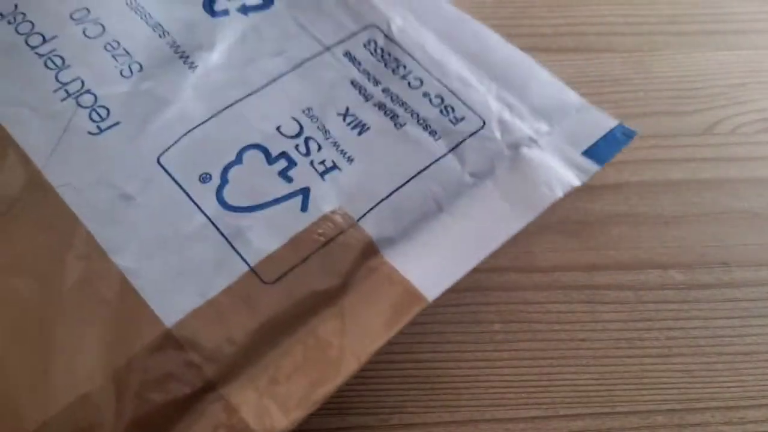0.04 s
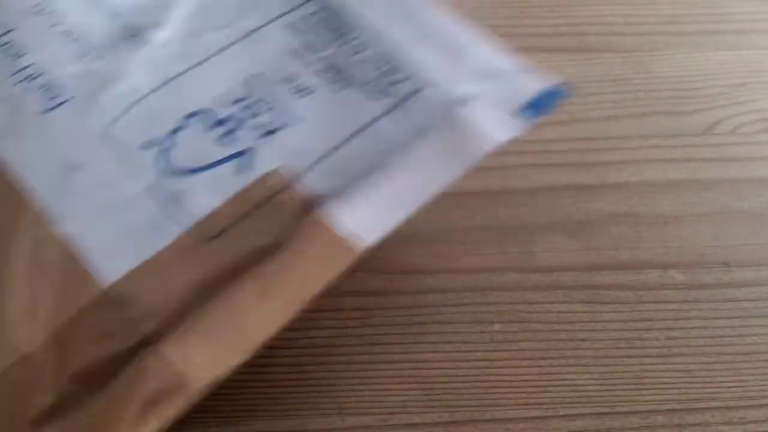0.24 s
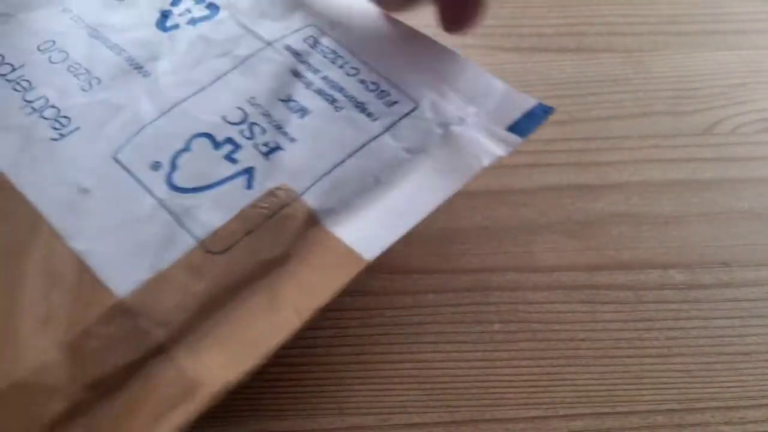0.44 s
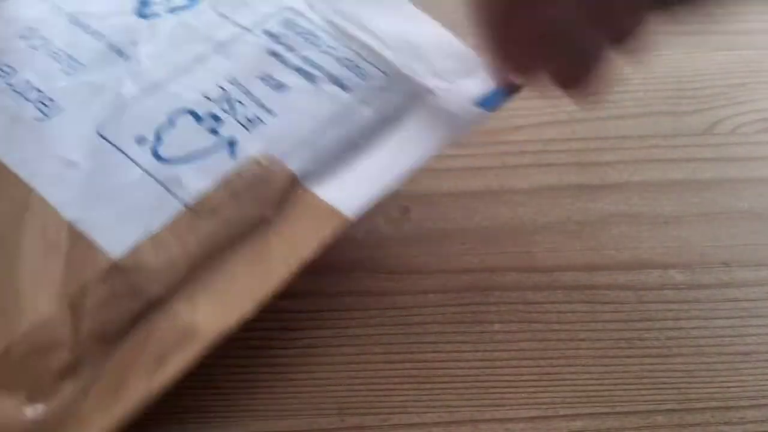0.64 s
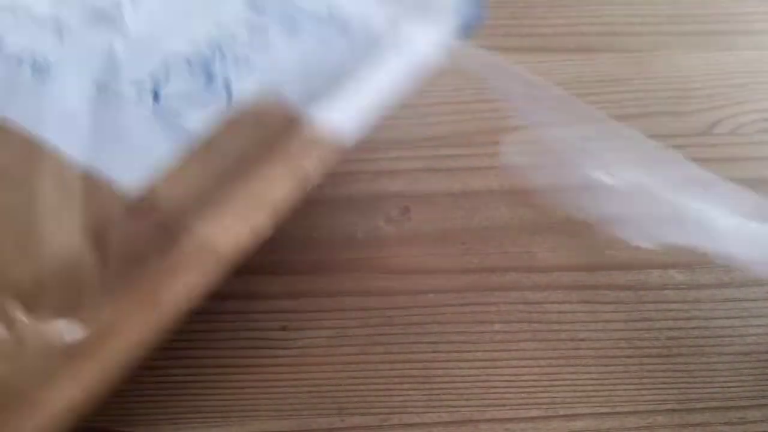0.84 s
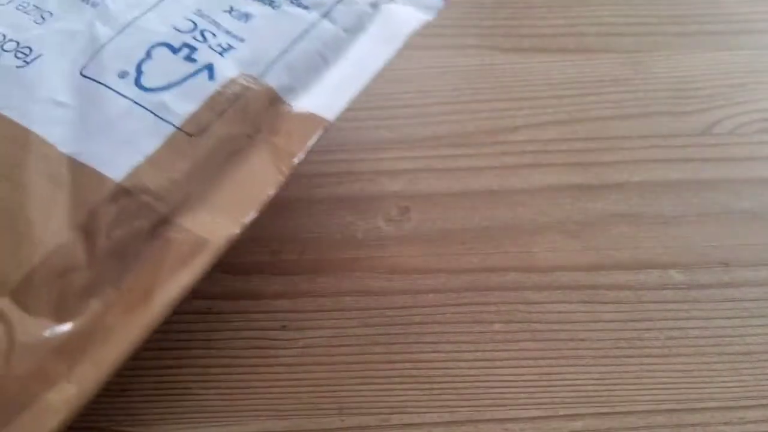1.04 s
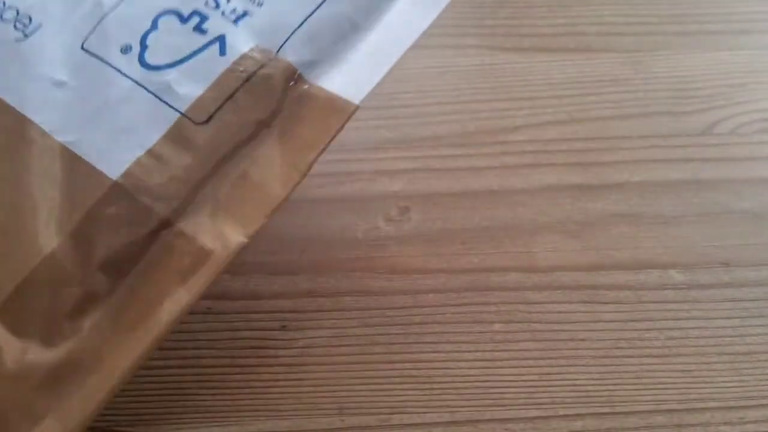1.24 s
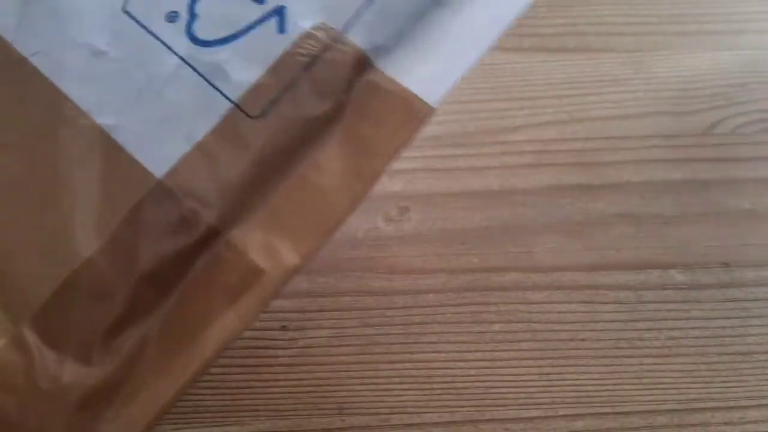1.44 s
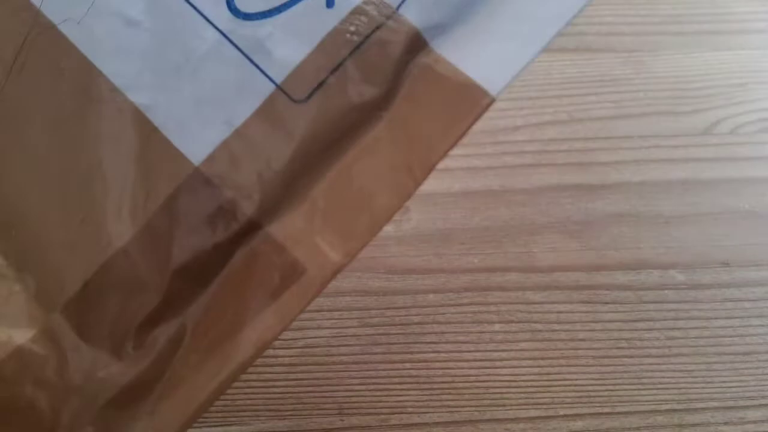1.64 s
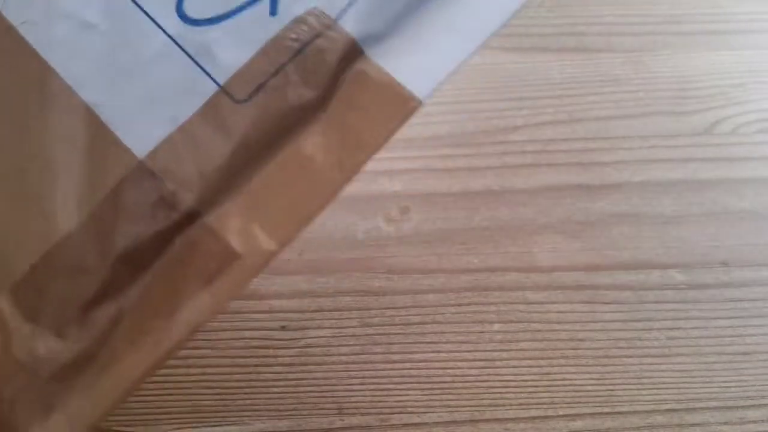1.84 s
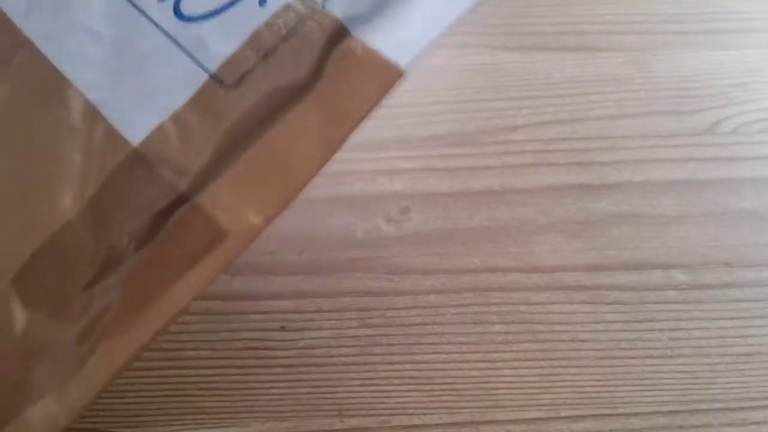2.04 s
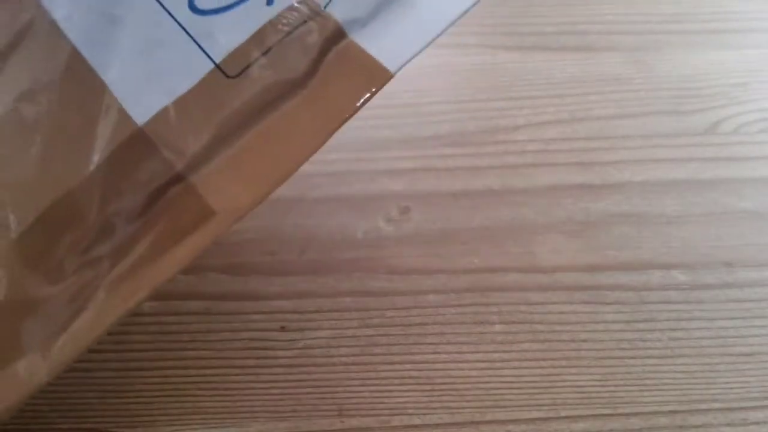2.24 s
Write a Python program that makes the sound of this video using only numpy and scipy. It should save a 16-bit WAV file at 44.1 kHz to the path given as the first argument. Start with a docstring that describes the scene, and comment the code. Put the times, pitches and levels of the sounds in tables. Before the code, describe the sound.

A padded paper mailer is torn open in quick ripping pulls, then crinkles softly on wood

```python
"""A padded paper mailer is torn open in a few quick pulls on a wooden table, heard from close by.
Tearing is dense swarms of tiny noise snaps and short pitched rings, with a low flutter of the bag.
Softer swarms slide the paper about, short noise cracks pop its creases, and soft knocks excite
decaying modes of the table top; one note judders briefly. A small room adds a short wash,
over low handling rumble and a quiet room tone."""
import sys
import numpy as np
from scipy import signal
from scipy.fft import rfft, irfft
from scipy.io import wavfile
from scipy.ndimage import uniform_filter1d

SR = 44100
rng = np.random.default_rng(int(sys.argv[2]) if len(sys.argv) > 2 else 0)


def master_out(mix):
    """Clip the mix to full scale and print it as 16-bit PCM to the path in sys.argv[1]."""
    frames = np.transpose(np.atleast_2d(mix))
    ceiling = np.clip(frames, -1, 1)
    pcm = np.round(ceiling * 32767).astype(np.int16)
    wavfile.write(sys.argv[1], SR, pcm)


N = 101430  # length in samples, 2.3 s


def undb(db):
    """Decibel law: level in dB to amplitude factor."""
    return 10 ** (np.asarray(db) / 20)


def unit(x):
    """Power normalisation: scale to rms 1."""
    return x / np.sqrt(np.mean(x ** 2) + 1e-18)


def panned(db):
    """Interaural level difference: gains of left and right, left louder by db."""
    return undb(np.array([[db], [-db]]) / 2)


def freqs(x):
    """Fourier analysis: bin frequencies in Hz, at least 1."""
    return np.maximum(np.fft.rfftfreq(x.shape[-1], 1 / SR), 1)


def curve(points, hz):
    """Spectral envelope: dB at the given frequencies, straight between points on a log axis."""
    p = np.array(points)
    return np.interp(np.log(hz), np.log(p[:, 0]), p[:, 1])


def bump(hz, centre, octaves):
    """Broad resonance: a bell on the octave scale, 1 at its centre."""
    return np.exp(-.5 * (np.log2(hz / centre) / octaves) ** 2)


def colour(x, db):
    """Linear filtering: a gain in dB for each frequency."""
    return irfft(rfft(x) * undb(db), x.shape[-1])


def bandpass(x, hz, octaves, order=1):
    """Causal band limiting, reaching so many octaves to each side."""
    low = min(hz / 2 ** octaves, SR / 4)
    high = min(hz * 2 ** octaves, .47 * SR)
    return signal.sosfilt(signal.butter(order, [low, high], "band", fs=SR, output="sos"), x)


PORTS_ALIKE_HZ = 890  # where likeness is midway between bass and treble
BASS_LIKENESS, TREBLE_LIKENESS = .76, 0.15  # shared part of the power


def ports(three):
    """Interaural coherence: a shared and two separate signals, alike in the bass, not the treble."""
    spectra = rfft(three)
    bass_share = 1 / (1 + (freqs(three) / PORTS_ALIKE_HZ) ** 4)
    alike = TREBLE_LIKENESS + (BASS_LIKENESS - TREBLE_LIKENESS) * bass_share
    stereo = np.sqrt(alike) * spectra[0] + np.sqrt(1 - alike) * spectra[1:]
    return irfft(stereo, three.shape[-1])


def noise(points):
    """Filtered random noise: stereo, of a given colour, rms 1."""
    x = ports(rng.standard_normal((3, N)))
    return unit(colour(x, curve(points, freqs(x))))


def envelope(at, rise, hold, fall):
    """Exponential growth and decay around a hold; rise and fall are the times for 20 dB."""
    t = np.arange(N) / SR - at
    return undb(-20 * (np.maximum(-t, 0) / rise + np.maximum(t - hold, 0) / fall))


def add(out, at, x):
    """Superposition: mix a short sound in at its time."""
    i = int(at * SR)
    out[:, i:i + x.shape[1]] += x[:, :N - i]


# Pulls that tear the paper: full_force_s, rise_s, hold_s, fall_s (rise and fall per 20 dB),
# level_db (before body and sheet boosts), body_db, flutter_db (relative to level_db),
# sheet_hz (resonance), pan_db (left over right)
PULLS = [(.256, 0.044, 0.058, 0.11, -27, 1, -20.5, 4800, -1),
         (.325, 0.085, 0.037, 0.058, -30.5, -3, -14, 6800, 0.5),
         (.412, 0.013, 0.0092, 0.033, -37, 1.5, -18, 7500, 1),
         (.485, 0.032, 0.0086, 0.028, -25.5, 0.5, -26.5, 4530, 0.5),
         (.512, 0.037, 0.014, 0.074, -36, 2, -20, 10000, 1.5),
         (.599, 0.04, 0.033, 0.093, -35.5, 0, -20.5, 8500, 1),
         (.652, 0.008, 0.0015, 0.022, -21.5, 4.5, -20.5, 5900, 3.5),
         (.673, 0.016, 0.011, 0.069, -19.5, 1.5, -22, 9400, -0.5),
         (.706, 0.01, 0.03, 0.039, -29, -0.5, -12, 8800, -1),
         (.81, 0.033, 0.0085, 0.081, -36.5, -8, -23, 6500, -3.5),
         (.848, 0.05, 0.023, 0.059, -31, 5, -10.5, 6800, -1)]
# Colour of tearing: pitch_hz, level_db (per Hz)
TEAR_COLOUR = [(180, -51.5), (300, -17.5), (634, -3.5), (978, -0.5), (1650, -4), (2610, -6), (3290, -2.5),
               (7700, -3.5), (9090, -3.5), (11200, -2.5), (12500, -4), (16000, -6.5)]
BUNDLE_DB = -4.5  # relative to the fine snaps


def tearing():
    """Brittle fracture: coarse, loud snapping of fibres along the tear."""
    def swarm(n):
        fine = fibres(n, per_s=4600, spread_db=4.4, ring_s=.001, clump_db=2.2, clump_hz=380)
        return fine + undb(BUNDLE_DB) * bundles(n)
    return strokes(PULLS, swarm, TEAR_COLOUR, sheet_db=4.0, sheet_octaves=0.16)


# Colour of the fluttering bag: pitch_hz, level_db (per Hz)
FLUTTER_COLOUR = [(25, -30), (60, 1.5), (110, -1), (200, -2), (330, -9.5), (550, -10), (1100, -60),
                  (4000, -57)]
STROKE_S = .6  # length of each swarm
BODY_HZ, BODY_OCTAVES = 1000, 1.0
BASS_PAN_DB = 3.5  # left over right


def strokes(rows, swarm, points, sheet_db, sheet_octaves):
    """Forced vibration: each movement works fresh paper with its own swarm and shakes the bag."""
    out = np.zeros((2, N))
    flutter = noise(FLUTTER_COLOUR) * panned(BASS_PAN_DB)
    for at, rise, hold, fall, db, body_db, flutter_db, sheet_hz, pan_db in rows:
        grains = swarm(int(STROKE_S * SR))
        hz = freqs(grains)
        grains = unit(colour(grains, curve(points, hz)))
        body = body_db * bump(hz, BODY_HZ, BODY_OCTAVES)
        resonance = sheet_db * bump(hz, sheet_hz, sheet_octaves)
        grains = colour(grains, body + resonance)
        sheet = np.zeros((2, N))
        add(sheet, max(at - STROKE_S / 3, 0), grains)  # leaves room for the rise
        moving = sheet * panned(pan_db) + undb(flutter_db) * flutter
        out += undb(db) * envelope(at, rise, hold, fall) * moving
    return out


def fibres(length, per_s, spread_db, ring_s, clump_db, clump_hz, count=4):
    """Clustered random impulses: uneven snaps in clumps; each patch of sheet rings in its own way."""
    t = np.arange(SR // 100) / SR
    drift = unit(uniform_filter1d(rng.standard_normal(length), int(SR / clump_hz)))
    clumps = undb(clump_db * np.tanh(drift))
    out = 0
    for _ in range(count):
        chance, size = rng.random(length), rng.standard_normal(length)
        strength = np.sign(size) * undb(spread_db * np.minimum(np.abs(size), 2))
        snaps = (chance < per_s / count / SR) * strength
        ring = rng.standard_normal((3, len(t))) * np.exp(-t / ring_s)
        out = out + signal.fftconvolve((snaps * clumps)[None], ring, axes=1)[:, :length]
    return unit(ports(out))


BUNDLES_PER_S, BUNDLE_HZ = 850, (800, 12000)
BUNDLE_CYCLES = 3.5  # ring decays by a factor e in this many cycles


def bundles(length):
    """Damped oscillation: bundles of fibres give way one by one, each ringing at its own pitch."""
    out, t = np.zeros((3, length)), np.arange(SR // 100) / SR
    for when, pitch, size, *sides in rng.random((int(BUNDLES_PER_S * length / SR), 6)):
        hz = np.exp(np.interp(np.sqrt(pitch), (0, 1), np.log(BUNDLE_HZ)))  # favours high pitches
        i = int(when * (length - len(t)))
        # the root of hz evens out the energy of short and long rings
        ring = np.sqrt(hz) * np.sin(2 * np.pi * hz * t) * np.exp(-hz * t / BUNDLE_CYCLES)
        polarity = np.sign(np.array(sides)[:, None] - .5)
        out[:, i:i + len(t)] += undb(10 * size) * polarity * ring
    return unit(ports(out))


# Paper sliding on wood and skin: full_force_s, rise_s, hold_s, fall_s (rise and fall per 20 dB),
# level_db (before body and sheet boosts), body_db, flutter_db (relative to level_db),
# sheet_hz (resonance), pan_db (left over right)
SLIDING_STROKES = [(.005, 0.034, 0.047, 0.026, -45.5, 12.5, -23, 3760, 1.5),
                   (.95, 0.037, .01, 0.24, -61.5, -7, -4, 7000, 4),
                   (1.04, 0.16, 0.13, 0.074, -53, -5, -23, 9400, -1.5),
                   (1.16, 0.035, 0.007, 0.068, -43, -1.5, -14.5, 9000, 0.5),
                   (1.258, 0.077, 0.079, 0.097, -48, 6.5, -6, 8060, 1.5),
                   (1.365, 0.035, 0.012, 0.091, -57.5, 5, 5, 7050, -2),
                   (1.6, .09, 0.032, .04, -71, 3.5, -15, 7060, -3),
                   (1.657, 0.0024, 0.0051, 0.013, -42.5, 11, -18, 1090, 2),
                   (1.677, 0.022, 0.038, 0.055, -41.5, 4, -33, 7950, -2.5),
                   (1.8, 0.087, 0.014, 0.023, -49, 18, -2, 6000, 0),
                   (1.868, 0.067, 0.017, 0.0071, -44, 13.5, -8, 6500, 0.5),
                   (1.99, 0.17, 0.03, 0.084, -57.5, 16.5, -1.5, 5960, -0.5),
                   (2.055, 0.094, 0.041, 0.034, -57, 16, -1, 4830, 1.5),
                   (2.145, 0.019, 0.026, 0.066, -50, 12, -1, 6300, 0.5),
                   (2.29, 0.07, .02, .05, -48, 12.5, -7, 4600, 1)]
# Colour of sliding: pitch_hz, level_db (per Hz)
SLIDE_COLOUR = [(150, -8), (450, -4), (1000, 1), (1600, -4.5), (3200, 3.5), (5500, 2), (10500, 2),
                (13000, -0.5), (16000, 0)]


def sliding():
    """Friction noise: fine, soft grain of paper rubbing along, with stray crinkles."""
    def swarm(n):
        rub = fibres(n, per_s=12000, spread_db=4, ring_s=.001, clump_db=2.2, clump_hz=200)
        crinkles = fibres(n, per_s=100, spread_db=5, ring_s=.0004, clump_db=2, clump_hz=40)
        return rub + undb(-6) * crinkles
    return strokes(SLIDING_STROKES, swarm, SLIDE_COLOUR, sheet_db=2.5, sheet_octaves=0.31)


# Creases popping: start_s, level_db (as if lasting 1 ms), centre_hz, pan_db (left over right)
CREASE_POPS = [(0.1369, -43.5, 5060, -2), (0.1874, -42.5, 5800, 0), (.208, -31, 7140, -4),
               (0.2218, -28, 2900, 3), (.238, -31.5, 4670, -9), (0.2923, -25.5, 5140, 12),
               (0.5732, -33.5, 8800, -6), (.636, -24, 3400, 3), (0.868, -32, 3330, -11),
               (0.8782, -19.5, 5800, -11.5), (0.9056, -24, 5730, -6.5), (1.057, -47.5, 6360, -22.5),
               (1.1534, -31, 9000, -17), (1.1834, -47.5, 3470, 18), (1.2523, -28.5, 5000, 0),
               (1.2737, -30.5, 7460, -2), (1.324, -36, 5350, 1), (1.3391, -30.5, 4150, -12),
               (1.37, -37, 2500, 4), (1.6567, -35, 3100, -6), (1.7711, -40, 3400, 17),
               (1.7788, -30, 6700, -4), (1.7875, -21.5, 2920, -2), (1.879, -35, 2480, -3),
               (1.93, -37.5, 1850, 1), (1.9838, -37.5, 5800, -3), (2.006, -37, 4470, 0),
               (2.0111, -30, 1840, 3), (2.066, -30, 4000, -6.5), (2.104, -45, 5960, 6),
               (2.243, -41.5, 5100, -1)]
POP_S, POP_TAIL_S, POP_TAIL_DB = 0.0005, 0.003, -11  # decay times; tail relative to crack
POP_OCTAVES, POP_LIKENESS = 1.01, 0.2  # half width of the band; power shared by left and right
POP_TICK_DB = -14  # unfiltered burst under the band-passed one


def creases():
    """Snap-through buckling: a crease flips with a sharp crack, then the sheet shivers for a moment."""
    out, t = np.zeros((2, N)), np.arange(SR // 40) / SR
    shape = np.exp(-t / POP_S) + undb(POP_TAIL_DB) * np.exp(-t / POP_TAIL_S)
    for at, db, hz, pan_db in CREASE_POPS:
        n = rng.standard_normal((3, len(t)))
        burst = (np.sqrt(POP_LIKENESS) * n[0] + np.sqrt(1 - POP_LIKENESS) * n[1:]) * shape
        crack = bandpass(burst, hz, POP_OCTAVES, order=2) + undb(POP_TICK_DB) * burst
        crack /= np.sqrt(np.sum(crack ** 2, axis=1, keepdims=True) / (SR / 1000))
        add(out, at, crack * undb(db) * panned(pan_db))
    return out


# The bag and the hand knocking on the table: start_s, level_db (energy of both sides over 20 ms),
# centre_hz (of the blow), ring_db (table against blow, before the final band-pass)
TABLE_KNOCKS = [(0.2228, -39, 706, -7), (0.353, -36.5, 108, 3), (0.653, -40, 130, -4),
                (0.7039, -33, 700, -17), (0.7103, -34, 710, -12), (.748, -42, 130, 5),
                (.852, -57, 1440, -8), (0.88, -30.5, 990, -10), (0.882, -33.5, 182, -6),
                (1.22, -49.5, 554, -3), (1.252, -45.5, 840, -7), (1.285, -41, 280, 5), (1.295, -43, 196, 4),
                (1.318, -41.5, 122, 1), (1.606, -61.5, 896, -11), (1.657, -43, 1013, -1.5),
                (1.7863, -27, 780, -11.5), (1.8, -38, 580, -22), (1.879, -44.5, 182, 0),
                (2.0111, -34, 434, -2.5), (2.017, -36, 151, 5), (2.023, -39, 530, 0.5),
                (2.104, -49.5, 980, 1), (2.109, -42.5, 152, -5), (2.137, -53.5, 980, -12),
                (2.245, -48, 536, -13)]
# Modes of the table top with the bag on it: pitch_hz, level_db, t60_s
MODES = [(126, -2, 0.061), (204, -7.5, 0.096), (259.5, 2.5, 0.027), (366, -3, 0.076), (529, 4, 0.11),
         (976, 0.5, 0.028)]
THUD_S, THUD_TAIL_S, THUD_TAIL_DB = .0018, .018, -22  # decay times; tail relative to thud
THUD_DB, KNOCK_OCTAVES = -1, .85  # thud relative to push; half width of the band


def knocks():
    """Modal excitation: a short push and a dead thud of padding, with the damped modes of the table."""
    out, t = np.zeros((2, N)), np.arange(SR // 4) / SR
    thud_shape = np.exp(-t / THUD_S) + undb(THUD_TAIL_DB) * np.exp(-t / THUD_TAIL_S)
    for at, db, hz, ring_db in TABLE_KNOCKS:
        detune = 1 + 0.019 * rng.standard_normal(len(MODES))
        ring = 0
        for (mode_hz, mode_db, t60), k in zip(MODES, detune):
            ring = ring + undb(mode_db) * np.sin(2 * np.pi * mode_hz * k * t) * undb(-60 * t / t60)
        thud = ports(rng.standard_normal((3, len(t)))) * thud_shape
        thud = unit(bandpass(thud, hz, KNOCK_OCTAVES))
        push = unit(bandpass(signal.unit_impulse(len(t)), hz, KNOCK_OCTAVES))
        both = undb(ring_db) * unit(ring) + unit(push + undb(THUD_DB) * thud)
        blow = bandpass(both, hz, KNOCK_OCTAVES, order=2)
        blow /= np.sqrt(np.sum(blow ** 2) / (SR / 50))
        add(out, at, blow * undb(db) * panned(BASS_PAN_DB))
    return out


JUDDER_AT_S, JUDDER_RISE_S, JUDDER_HOLD_S, JUDDER_FALL_S = 1.378, .04, .01, .024
JUDDER_HZ, JUDDER_DB = 537, -45.5


def judder():
    """Stick-slip: sticking and slipping holds one rough note of the table for a moment."""
    waver, grip = (unit(uniform_filter1d(rng.standard_normal(N), SR // 200)) for _ in range(2))
    phase = 2 * np.pi * np.cumsum(JUDDER_HZ * (1 + .025 * waver)) / SR
    note = unit(np.sin(phase) * undb(3 * grip))
    swell = envelope(JUDDER_AT_S, JUDDER_RISE_S, JUDDER_HOLD_S, JUDDER_FALL_S)
    return note * undb(JUDDER_DB) * swell * panned(BASS_PAN_DB)


ROOM_T60_S, ROOM_DB, ROOM_DULL_HZ = .25, -16, 9000


def room(x):
    """Reverberation: a short, dull wash from nearby walls, as convolution with decaying noise."""
    t = np.arange(SR // 2) / SR
    decay = undb(-60 * t / ROOM_T60_S) * (1 - np.exp(-t / 0.02))  # builds up over about 20 ms
    wash = ports(rng.standard_normal((3, len(t)))) * decay
    wash = signal.sosfilt(signal.butter(1, ROOM_DULL_HZ, fs=SR, output="sos"), wash)
    return undb(ROOM_DB) * signal.fftconvolve(x, unit(wash) / np.sqrt(len(t)), axes=1)[:, :N]


# Colour of the handling rumble: pitch_hz, level_db (per Hz)
HANDLING_COLOUR = [(20, -16), (40, -5.5), (58, 5), (85, 1), (140, -27), (2000, -89)]
# Level of the handling rumble over time: time_s, level_db
RUMBLE_LEVEL = [(0, -56.5), (.2, -60.5), (.33, -43.5), (0.447, -60.5), (.6, -50), (1.15, -60.5),
                (1.599, -67.5), (1.83, -53.5), (1.96, -60), (2.03, -46), (2.3, -79)]


def handling():
    """Amplitude-modulated noise: the low rumble of handling swells and sinks."""
    level_db = np.interp(np.arange(N) / SR, *np.array(RUMBLE_LEVEL).T)
    return noise(HANDLING_COLOUR) * undb(level_db) * panned(BASS_PAN_DB)


# Colour of the quiet room: pitch_hz, level_db (per Hz)
ROOM_COLOUR = [(20, -7.5), (55, -5), (100, -13.5), (200, -20), (500, -31.5), (900, -29.5), (1500, -46.5),
               (4000, -52.5), (16000, -42.5)]
ROOM_TONE_DB = -61


def room_tone():
    """Stationary background noise: the steady hush of the room."""
    return undb(ROOM_TONE_DB) * noise(ROOM_COLOUR)


def scene():
    """Superposition of the near sources, their reverberation and the background."""
    near = tearing() + sliding() + creases() + knocks() + judder()
    return near + room(near) + handling() + room_tone()


TOP_HZ = 15900


def record(dry):
    """Band limiting: a steep elliptic low-pass cuts the top."""
    return signal.sosfilt(signal.ellip(10, .2, 80, TOP_HZ, fs=SR, output="sos"), dry)


dry = scene()
out = record(dry)
master_out(out)
```